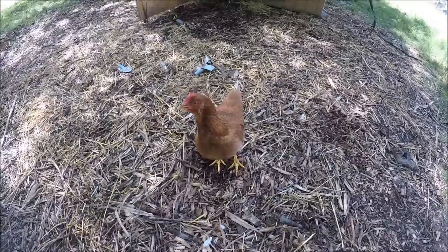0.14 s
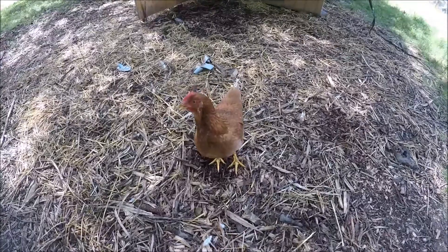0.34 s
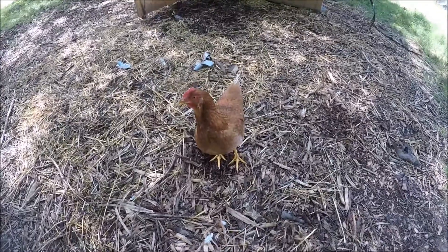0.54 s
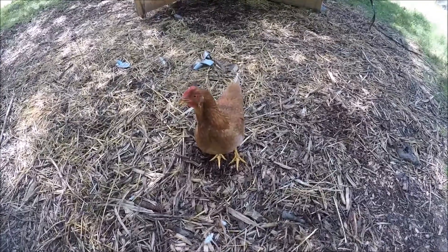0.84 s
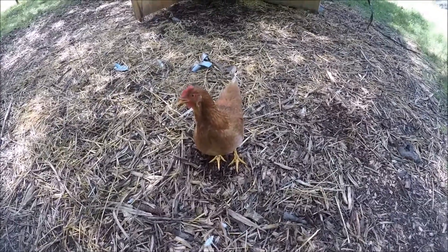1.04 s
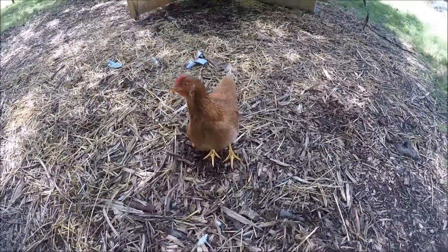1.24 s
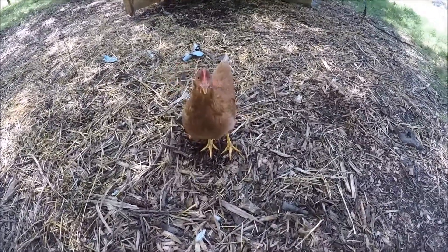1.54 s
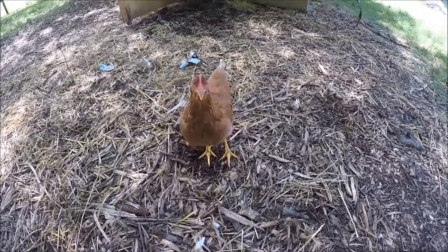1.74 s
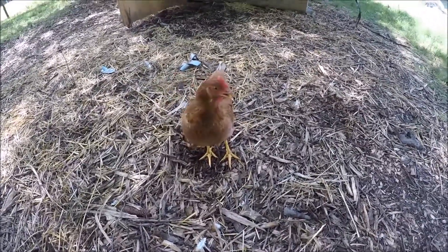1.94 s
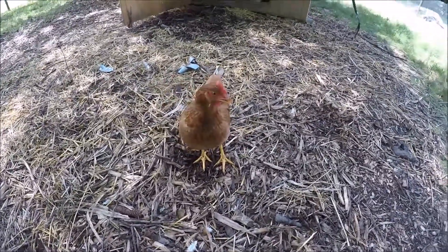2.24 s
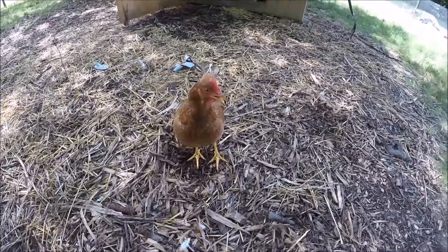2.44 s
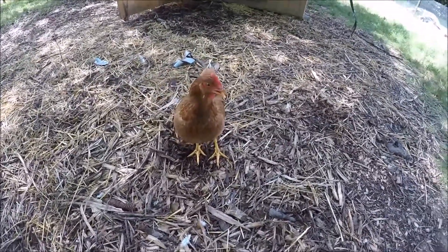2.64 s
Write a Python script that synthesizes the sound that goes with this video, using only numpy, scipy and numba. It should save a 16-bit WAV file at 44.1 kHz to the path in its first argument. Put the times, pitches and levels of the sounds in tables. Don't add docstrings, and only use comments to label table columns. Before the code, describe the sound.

Four long, nasal chicken calls, each opening with a cluck, over soft leaf and insect hiss.

```python
import sys
import numpy as np
from scipy import signal
from scipy.io import wavfile
from scipy.ndimage import uniform_filter1d
from numba import njit

SR = 44100
rng = np.random.default_rng(int(sys.argv[2]) if len(sys.argv) > 2 else 0)


def to_wav(s):
    ch = np.atleast_2d(s).T
    pcm = np.round(np.clip(ch, -1, 1) * 32767)
    wavfile.write(sys.argv[1], SR, pcm.astype(np.int16))


def gain_from_decibels(decibels):
    exponent = np.asarray(decibels, float) / 20
    return 10 ** exponent


N = 123479


def level(x, db):
    return x * gain_from_decibels(db) / np.sqrt(np.mean(x ** 2))


@njit
def svf(x, hz, width):
    y, band, low = np.empty(len(x)), 0., 0.
    for i in range(len(x)):
        g, k = np.pi * hz[i] / SR, width / hz[i]
        g += g ** 3 / 3 + g ** 5 / 7.5
        v = (band + g * (x[i] + 1e-18 - low)) / (1 + g * (g + k))
        band, low, y[i] = 2 * v - band, low + 2 * g * v, k * v
    return y


def steep(x, hz, width):
    hz = hz + np.zeros(N)
    return svf(svf(x, hz, 1. * width), hz, 1. * width)


def walk(rate):
    k = int(SR / rate)
    held = np.repeat(rng.standard_normal(N // k + 1), k)
    return 1.19 * uniform_filter1d(uniform_filter1d(held, k), k)[:N]


def steps(rows, t, size=300):
    return uniform_filter1d(sum(((t >= a) & (t < b)) * (1. * v) for a, b, v in rows), size=size)


def pan(x, db):
    return x * gain_from_decibels(np.array([db / 2, -db / 2]).reshape(2, -1))


def late(pair, lag_s, t):
    return np.array([pair[0], np.interp(t - lag_s, t, pair[1])])


# (frequency [Hz], level per Hz [dB])
HISS_SPECTRUM = [(180, -50.5), (300, -28.5), (1160, 3), (1340, -2), (1650, -1), (1940, -2), (3750, -7),
                 (6070, -2.5), (10000, -15.5), (14000, -31.5)]
# (frequency [Hz], level [dB])
HISS_SIDE = [(150, -7), (1000, 8.5), (4000, -10), (7000, 4.5), (12000, -4.5)]
# (time [s], level [dB])
LEAVES = [
    (0, -4),
    (.35, 2),
    (.6, -3.5),
    (1.3, -3.5),
    (2.049, 1),
    (2.4, -2.5),
    (2.8, -1.5),
]


def hiss(t):
    def at(table, hz):
        table_hz, db = np.array(table).T
        return np.interp(np.log(hz), np.log(table_hz), db)

    out = 0
    for hz in 150 * 2 ** np.arange(0, 6.5, 1 / 3):
        mid, side = (steep(rng.standard_normal(N), hz, hz / 2.8) for _ in range(2))
        wide = gain_from_decibels(at(HISS_SIDE, hz)) * side * np.array([[1], [-1]])
        flicker_db = .7 * walk(2.9)
        out = out + gain_from_decibels(at(HISS_SPECTRUM, hz) + flicker_db) * (mid + wide)
    above = signal.sosfilt(signal.butter(2, 600, "high", fs=SR, output="sos"), out.mean(0))
    return out * gain_from_decibels(-49.5 + np.interp(t, *np.array(LEAVES).T)) / np.std(above)


# (time [s], level [dB])
WIND = [
    (0, -44),
    (.5, -48),
    (.85, -41.5),
    (1.2, -42),
    (1.6, -41.5),
    (1.9, -43.5),
    (2.0, -36),
    (2.2, -42.5),
    (2.4, -50.5),
    (2.8, -45.5),
]


def wind(t):
    ports = []
    for _ in range(2):
        gusty = rng.standard_normal(N) * gain_from_decibels(3 * walk(33.54))
        ports.append(level(steep(gusty, 196, 372), 0))
    left, own = ports
    share, lag_s = 0.41, .0012
    right = share * np.interp(t - lag_s, t, left) + np.sqrt(1 - share ** 2) * own
    pop_s, pop_hz = 1.9665, 300
    thump = -np.exp(-((t - pop_s) * pop_hz * 7.0) ** 2)
    return np.array([left, right]) * gain_from_decibels(np.interp(t, *np.array(WIND).T)) + gain_from_decibels(-24) * pan(thump, 31.5)


# (start [s], end [s], head turn left-right [dB], brightness [dB], neck shortening [share])
SPANS = [
    (0.019, 0.308, -9.5, -2, -0.02),
    (0.585, 1.114, -8, 0.5, -0.024),
    (1.393, 1.968, -4, 5.5, 0.013),
    (2.199, 2.692, -5.5, 1.5, -0.032),
]
# (length [s], pitch [Hz], level [dB])
CLUCKS = [
    (.032, 311, -23.5),
    (0.0279, 311, -22.5),
    (0.03, 339, -23.5),
    (0.02985, 328, -19.5),
]
# (time [s], pitch [Hz], level [dB], beak opening [dB])
CALL_1 = [
    (0.061, 366.4, -23.5, -15.5),
    (0.094, 368.5, -26.5, -15),
    (0.15, 366.6, -24, -7),
    (0.165, 380.6, -30.5, -3),
    (0.175, 363, -24, -8),
    (0.199, 362.3, -22.5, -10),
    (0.285, 353.6, -24.5, -8.5),
]
CALL_2 = [
    (.628, 349, -27.5, -9),
    (0.664, 377.5, -24.5, -14),
    (0.734, 384, -24.5, -13),
    (0.751, 370.8, -25, -7.5),
    (0.829, 373.5, -24, -10),
    (.9, 372.4, -22.5, -5),
    (0.981, 349.5, -22, -8),
    (1.043, 386.3, -20.5, -4),
    (1.1, 360.2, -23, -10),
]
CALL_3 = [
    (1.436, 363, -27, -8.5),
    (1.469, 363.4, -25.5, -9.5),
    (1.53, 372.7, -23, -11.5),
    (1.601, 381.3, -22, -10),
    (1.72, 391.2, -20.5, -10),
    (1.781, 398.8, -20, -5.5),
    (1.841, 398, -19.5, -5.5),
    (1.909, 411.7, -18, -2),
    (1.95, 399, -20, -3),
]
CALL_4 = [
    (2.235, 340.5, -21.5, -7.5),
    (2.29, 351, -21, -4.5),
    (2.339, 375.3, -20.5, -6),
    (2.389, 375.4, -19.5, -4.5),
    (2.428, 403.3, -20, -2.5),
    (2.487, 391, -19.5, -3),
    (2.557, 385, -18, -5.5),
    (2.628, 391.8, -18.5, -2.5),
    (2.68, 381.5, -19.5, -6.5),
]


def call_course(t):
    rows = []
    for (start, *_), (long, hz, db), call in zip(SPANS, CLUCKS, (CALL_1, CALL_2, CALL_3, CALL_4)):
        rows += [(start, hz * 1.02, db - 5, -4.5), (start + long / 2, hz, db, -4.5),
                 (start + long, hz, db - 5, -4.5)] + call
    time_s, *courses = np.array(sorted(rows)).T
    return [np.interp(t, time_s, course) for course in courses]


def span_setting(column, t):
    return steps([(s[0] - .05, s[1] + .05, s[column]) for s in SPANS], t)


def in_clucks(values, t):
    return steps([(s[0], s[0] + c[0], v) for s, c, v in zip(SPANS, CLUCKS, values)], t)


@njit
def flap(hz, jitter, scatter, chance):
    out, phase, k = np.zeros((3, len(hz) + 1)), 0., 0
    for i in range(len(hz)):
        step = hz[i] / max(1 + jitter[i] * chance[k, 0], .4) / SR
        phase += step
        if phase >= 1:
            phase, k = phase - 1, k + 1
            size, sign = np.exp(scatter[i] * chance[k, 1]), 1. - 2 * (k % 2)
            for j in range(2):
                share = size * (phase / step if j == 0 else 1 - phase / step)
                out[0, i + j] += share
                out[1, i + j] += share * sign
        out[2, i] = phase
    return out[:, :-1]


# (start [s], end [s], roughness [0-1])
BREAKS = [(.125, .15, .35), (.15, .17, .7), (.195, .23, .15), (.745, .785, .9), (.785, .848, .25),
          (.848, .915, 1), (.915, .932, .3), (.932, .97, .85), (.99, 1.012, .9), (1.012, 1.04, .35),
          (.97, .99, .15), (1.04, 1.09, .25), (1.885, 1.935, .1), (2.228, 2.3, .25), (2.3, 2.35, .12),
          (2.35, 2.368, .8), (2.368, 2.398, .2), (2.398, 2.42, .9), (2.438, 2.482, .95), (2.635, 2.665, .6)]
# (start [s], end [s], blur [ms])
HOARSE = [(0, .06, .05), (.06, .32, .08), (.58, .62, .05), (.62, 1.13, .1), (1.38, 1.44, .05),
          (1.44, 1.73, .014), (1.73, 1.98, .024), (2.19, 2.23, .025), (2.23, 2.485, .04),
          (2.485, 2.635, .014), (2.635, 2.71, .04)]
# (start [s], end [s], limp [dB])
LIMPS = [(.03, .12, -14), (.12, .27, -4), (.59, .62, -14), (.63, .74, -19), (.74, .86, 3), (.86, 1.09, -2),
         (1.4, 1.43, -3), (1.43, 1.5, -16), (1.5, 1.535, -10), (1.535, 1.575, -16), (1.575, 1.615, -7),
         (1.615, 1.64, -17), (1.64, 1.675, -9), (1.675, 1.73, -16), (1.73, 1.84, -7), (1.86, 1.95, -6),
         (2.2, 2.48, -2), (2.48, 2.63, -13), (2.63, 2.69, -3)]
# (time [s], length [s], gain [dB])
CATCHES = [(0.172, 0.0037, -1), (0.869, 0.0051, -5), (0.889, .004, -9), (0.911, 0.0028, -4),
           (0.936, .008, 0.5), (0.991, 0.0046, 1), (1.025, .012, 0.5), (1.036, 0.0035, -8),
           (2.367, 0.0059, -1.5), (2.403, 0.012, 3), (2.442, .008, 4), (2.448, .005, -4.5),
           (2.457, 0.0055, 1.5), (2.461, 0.0045, -4), (2.47, 0.0046, 0), (2.471, .004, -4),
           (2.479, 0.0059, 3), (2.651, 0.0038, 2)]


def throat(t, hz, db):
    rough, blur_ms = steps(BREAKS, t), np.maximum(steps(HOARSE, t), 0)
    limp = steps([(a, b, gain_from_decibels(d)) for a, b, d in LIMPS], t, size=900) * gain_from_decibels(4 * walk(30))
    jitter = .007 * np.sqrt(blur_ms / .06) + .17 * rough
    scatter = (0.56 + 2.5 * rough) * np.log(10) / 20
    chance = np.clip(rng.standard_normal((4000, 2)), -2, 2)
    even, odd, phase = flap(hz * (1 + .22 * rough ** 3), jitter, scatter, chance)

    attack_s, release_s = 0.0032, 0.021
    gate = sum(np.clip((t - a) / attack_s, 0, 1) * np.clip((b - t) / release_s, 0, 1) ** 1.1
               for a, b, *_ in SPANS)
    catch_db = sum(d * np.exp(-(2 * (t - s) / long) ** 2) for s, long, d in CATCHES)
    gain = gate * gain_from_decibels(db + catch_db) * SR / 550
    even, odd = even * gain, odd * gain * limp
    breath = np.sqrt(blur_ms / 0.032) * np.exp(-phase / 2.5) * rng.standard_normal(N) * gain
    shaky = np.interp(t + blur_ms / 1000 * walk(300), t, even)
    return rough, even, odd, shaky, breath


# (frequency [Hz], width [Hz], level [dB], left-right [dB])
PIPE = [
    (385, 320, -5.5, -1.5),
    (770, 208, -3, 2.5),
]


def windpipe(t, even, odd, beak_db):
    closed = np.sqrt(np.clip(1 - gain_from_decibels(2 * beak_db), .05, 1))
    low, high = (gain_from_decibels(d) * steep(even * closed, f, w) for f, w, d, _ in PIPE)
    low = low + gain_from_decibels(-23.5) * steep(odd, 183.6, 61)
    low_pair, high_pair = pan(low, PIPE[0][3]), pan(high, PIPE[1][3] + span_setting(2, t))
    lag_s = 0.00014
    return late(low_pair, lag_s, t) - late(high_pair, lag_s, t)


# (frequency [Hz], width [Hz], level [dB], left-right [dB])
BEAK = [
    (1061, 536, -1, 5),
    (1556, 910, -14, 5.5),
    (1908, 240, -8.5, 4),
]
# (frequency [Hz], width [Hz], level [dB])
LIMP_RING = [
    (950, 240, -8),
    (1300, 280, 0),
]
# (throat ring [Hz], beak turn left-right [dB], ring in the cluck [dB], second beak resonance [dB])
COLOURS = [
    (1254, -0.7, -2.5, 1),
    (1244, 0.7, -4, -0.5),
    (1225, -1, -7, 1.5),
    (1193.9, -2.5, -1, -5.5),
]


def beak_cavity(t, shaky, odd, breath, rough, beak_db):
    ends = [x for s in SPANS for x in s[:2]]
    ring_hz, turn_db, _, second_db = (np.interp(t, ends, np.repeat(c, 2)) for c in zip(*COLOURS))
    ring_gain = in_clucks([gain_from_decibels(c[2]) for c in COLOURS], t) + gain_from_decibels(-2.5) * np.sqrt(rough + 1e-9)
    ring = steep(shaky * ring_gain, ring_hz * (1 + .03 * walk(39.91)), 190)
    out = pan(ring, BEAK[0][3] + turn_db)

    opened = gain_from_decibels(beak_db - 4 * rough)
    dull_db = in_clucks([-5] * 4, t)
    air = gain_from_decibels(-30) * breath
    for k, (hz, width, db, side_db) in enumerate(BEAK):
        tilt_db = dull_db * (k > 0) + second_db * (k == 1)
        wavering = shaky * gain_from_decibels(3 * walk(70)) + air
        tone = steep(wavering * opened * gain_from_decibels(tilt_db), hz, width)
        out = out + (-1) ** k * gain_from_decibels(db) * pan(tone, side_db + turn_db)
    for k, (hz, width, db) in enumerate(LIMP_RING):
        tone = steep(odd * opened, hz, width)
        out = out + (-1) ** k * gain_from_decibels(db + BEAK[0][2]) * pan(tone, BEAK[0][3])
    return late(out, .00009, t)


# (frequency [Hz], width [Hz], level [dB], left-right [dB], limping share [dB])
EDGE = [
    (2720, 1160, -33.5, -5, -6),
    (3722, 453, -17.5, 2, -5),
    (4540, 850, -36.5, -6, -3),
    (6360, 960, -36.5, 3, -6),
    (7570, 440, -60, -7, 17),
]
# (time [s], shortening [share])
STRETCH = [
    (1.42, .02),
    (1.46, -.02),
    (1.72, .03),
    (1.82, -.01),
    (1.95, -.06),
    (2.1, 0),
]


def bright_edge(t, shaky, odd, breath, db):
    neck = span_setting(4, t) + np.interp(t, *np.array(STRETCH).T, left=0)
    bright = gain_from_decibels(span_setting(3, t) + db + 20.5)
    out = 0
    for k, (hz, width, mode_db, side_db, limp_db) in enumerate(EDGE):
        drive = (shaky + gain_from_decibels(limp_db) * odd + gain_from_decibels(-23) * breath) * bright
        tone = steep(drive, hz * (1 + neck * (hz < 5000)), width)
        out = out + (-1) ** k * gain_from_decibels(mode_db) * pan(tone, side_db)
    return out


def hen(t):
    hz, db, beak_db = call_course(t)
    rough, even, odd, shaky, breath = throat(t, hz, db)
    pipe = windpipe(t, even, odd, beak_db)
    beak = beak_cavity(t, shaky, odd, breath, rough, beak_db)
    return bright_edge(t, shaky, odd, breath, db) - pipe - beak


def yard(bird, t):
    t60_s = 0.18
    tail = rng.standard_normal((2, 9000)) * gain_from_decibels(-60 * t[:9000] / t60_s)
    tail = gain_from_decibels(-43.5) * tail / np.sqrt(np.sum(tail[0] ** 2))
    return signal.fftconvolve(bird, tail, axes=1)[:, :N]


def scene():
    t = np.arange(N) / SR
    bird = hen(t)
    return hiss(t) + wind(t) + bird + yard(bird, t)


def top_cut(x):
    return signal.sosfilt(signal.butter(12, 14900, fs=SR, output="sos"), x)


def record(dry):
    cut = signal.sosfilt(signal.butter(9, 144.7, "high", fs=SR, output="sos"), dry)
    rumble = np.array([level(steep(rng.standard_normal(N), 40, 150), -73.5) for _ in range(2)])
    return top_cut(cut + rumble)


dry = scene()
out = record(dry)
to_wav(out)
```